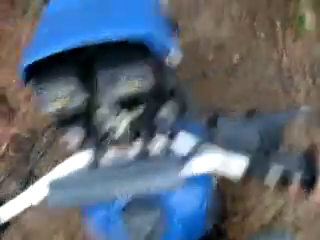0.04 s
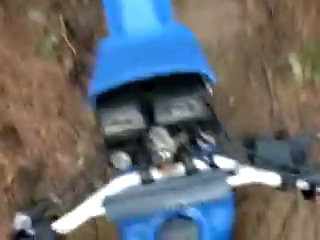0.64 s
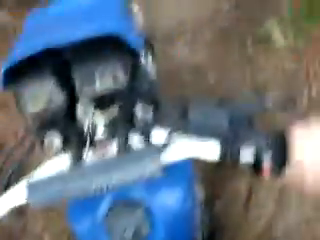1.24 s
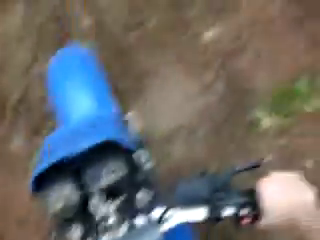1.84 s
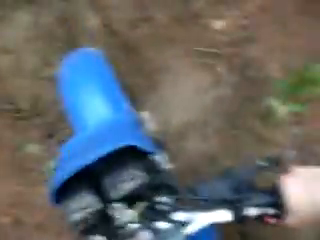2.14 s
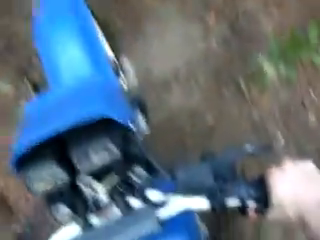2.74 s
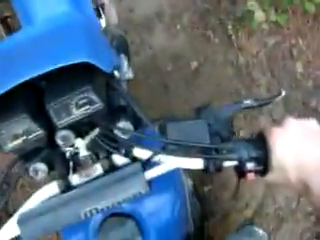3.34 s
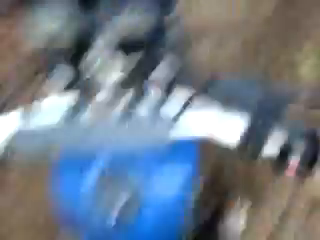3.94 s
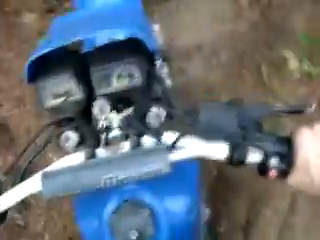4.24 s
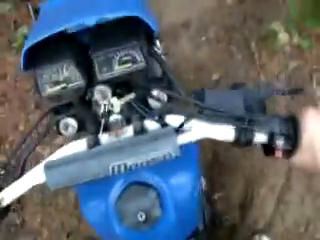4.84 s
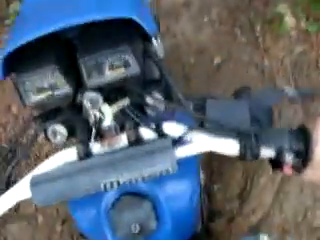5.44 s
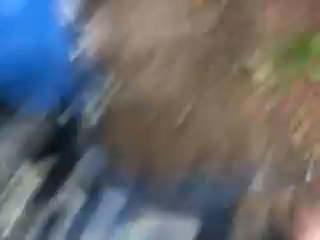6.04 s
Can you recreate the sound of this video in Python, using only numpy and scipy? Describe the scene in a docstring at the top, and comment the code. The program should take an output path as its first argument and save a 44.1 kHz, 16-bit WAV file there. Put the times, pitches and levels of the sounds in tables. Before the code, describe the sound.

Bursts of low thumps, plastic knocks and metallic clicks come from a stopped motorcycle being rocked, over faint hiss.

```python
"""A dirt bike, engine off, is rocked and shoved by the handlebar, outdoors on bare soil.
Close to the one microphone, the front end thumps and booms, plastic panels knock, tyres and
panels chafe, and small metal parts tick and scrape. Hard jolts make the hand-held camera pop;
its own hiss and thin whine lie under everything."""
import sys
import numpy as np
from scipy import signal
from scipy.fft import rfft, irfft, next_fast_len
from scipy.io import wavfile
from scipy.ndimage import map_coordinates

SR = 44100
rng = np.random.default_rng(int(sys.argv[2]) if len(sys.argv) > 2 else 0)


def unload_audio(sound):
    """Save the sound as a 16-bit wav file, at the path given as the first command line argument."""
    columns = np.transpose(np.atleast_2d(sound))
    # keep every value between -1 and 1, then stretch to whole-number steps
    steps = np.round(np.clip(columns, -1, 1) * 32767)
    wavfile.write(sys.argv[1], SR, steps.astype(np.int16))


N = 272531


def amp(db):
    """Decibels to gain."""
    return 10 ** (np.asarray(db) / 20)


def unit(x):
    """Scaled to rms 1."""
    return x / np.sqrt(np.mean(x ** 2) + 1e-20)


def add(track, start_s, sound):
    """Mix a sound into the track."""
    start = max(round(start_s * SR), 0)
    track[start:start + len(sound)] += sound[:max(N - start, 0)]


def wobble(rate_hz):
    """A smooth random curve through rate_hz knots a second."""
    knots = rng.standard_normal(int(N * rate_hz / SR) + 4)
    return map_coordinates(knots, [np.arange(N) * rate_hz / SR])


def gain(spectrum, hz):
    """Gain at hz, read from (freq_hz, level_db) points on a log axis."""
    freq_hz, level_db = np.transpose(spectrum)
    return amp(np.interp(np.log(hz + 1), np.log(freq_hz), level_db))


def filtered(x, response):
    """x shaped by a gain that is a function of frequency."""
    size = next_fast_len(len(x) + 8192)
    return irfft(rfft(x, size) * response(np.fft.rfftfreq(size, 1 / SR)), size)[:len(x)]


def body_response(spectrum, size=4096):
    """Minimum-phase ring with the given spectrum: it starts only at the blow."""
    cepstrum = irfft(np.log(gain(spectrum, np.fft.rfftfreq(size, 1 / SR))))
    cepstrum[1:size // 2] *= 2
    cepstrum[size // 2 + 1:] = 0
    return irfft(np.exp(rfft(cepstrum)))


def envelope(t, t60_s, rise_s):
    """A quick rise and a decay of 60 dB in t60_s."""
    return amp(-60 * t / t60_s) * (1 - np.exp(-t / rise_s))


def softness(level_db, double_db):
    """A factor that doubles with every double_db by which a blow is softer than full scale."""
    return 2 ** (-level_db / double_db)


def rattle(body, level_db, t60_s, rise_s, first_contact):
    """One blow: a firm first contact, then a dying flurry of tiny ones, all ringing a body."""
    t = np.arange(SR // 4) / SR
    fade = envelope(t, t60_s, rise_s)
    force = fade * rng.standard_normal(len(t))
    force[0] += first_contact * np.linalg.norm(fade)
    ring = signal.fftconvolve(force, body)[:len(t)]
    return amp(level_db) * ring * np.linalg.norm(fade) / np.linalg.norm(ring)


def background(air_db=-44.5, whine_db=-52.5, whine_hz=7849.5, skips_per_s=23):
    """Still outdoor air and hiss, with the camera's thin whine, which flutters as its phase skips."""
    # spectrum of the air and hiss: freq_hz, level_db
    air_spectrum = [(15, -34), (25, -4.5), (108, -2), (166, -5.5), (262, -4), (298, -7.5), (338, -4),
                    (519, -4.5), (905, -10.5), (1620, -15), (6020, -22.5), (7950, -22.5), (10500, -25.5),
                    (13600, -55), (22000, -120)]
    air = unit(filtered(rng.standard_normal(N), lambda hz: gain(air_spectrum, hz)))
    t = np.arange(N) / SR
    skip_index = (t * skips_per_s).astype(int)
    phase_rad = np.cumsum(rng.normal(0, 1.9, skip_index[-1] + 1))
    whine = unit(np.sin(2 * np.pi * whine_hz * t + phase_rad[skip_index]))
    return amp(air_db) * air + amp(whine_db) * whine


def strain(swell_share=0.77):
    """Each shove builds to its peak in swell_share of the time it takes to ease off."""
    # shifts of the bike's weight: peak_s, level_db, ease_s (to fall by 20 dB)
    shoves = [(.12, -46.5, .3), (.32, -39, 0.07), (.70, -36.5, 0.13), (.80, -36, 0.1), (1.0, -40, .2),
              (1.501, -19, 0.1633), (1.61, -28.5, 0.18), (2.1, -41, 1.1), (2.29, -38, 0.5),
              (2.58, -37.5, .1), (2.72, -40, 0.53), (3.07, -45, 0.4), (4.36, -36, 0.1), (4.49, -20, 0.15),
              (4.65, -31, 0.3), (5.05, -37, 0.33), (5.32, -45, 1), (5.70, -37, 0.1), (5.87, -45, 0.8),
              (6.05, -42, .2)]
    t, level = np.arange(N) / SR, np.zeros(N)
    for peak_s, level_db, ease_s in shoves:
        from_peak = np.maximum((peak_s - t) / swell_share, t - peak_s) / ease_s
        level = np.maximum(level, amp(level_db - 20 * from_peak))
    return level


def chafing(slip_db=2.0, bass_hz=200, stir_db=-31):
    """Tyres and panels rub softly in uneven little slips; only hard rubbing stirs the bass."""
    # spectrum of the rubbing: freq_hz, level_db
    rub_spectrum = [(25, -8), (70, 3.5), (180, 2.5), (400, 0.5), (700, -3), (1100, -18.5), (2000, -25.5),
                    (4000, -33.5), (11000, -57)]
    level = strain()
    slips = rng.standard_normal(N) * amp(slip_db * wobble(rate_hz=160))
    rub = unit(filtered(slips, lambda hz: gain(rub_spectrum, hz)))
    bass = filtered(rub, lambda hz: 1 / (1 + (hz / bass_hz) ** 4))
    bass_cut = 1 / (1 + (level / amp(stir_db)) ** 2)
    return level * (rub - bass_cut * bass)


def metal_ticks(focus_db=9, middle_hz=2900):
    """Small steel parts ring in the resonances nearest their pitch; larger ones are lower and duller."""
    # ticks of levers, cables and keys: start_s, level_db, pitch_hz
    ticks = [(.039, -33, 1700), (.088, -38.5, 2300), (1.461, -21.5, 3730), (1.513, -16.5, 4500),
             (1.53, -29, 3500), (1.581, -32.5, 2400), (1.688, -33, 2387), (1.743, -28.5, 1700),
             (1.805, -38, 2000), (1.847, -35.5, 3200), (2.31, -27, 3350), (2.711, -32, 2300),
             (2.76, -33.5, 2500), (4.451, -21.5, 2710), (4.515, -29, 4500), (4.536, -27, 3100),
             (4.588, -32.5, 2000), (4.703, -27.5, 2050), (4.751, -31.5, 2400), (4.807, -30.5, 2300),
             (4.828, -35.5, 2300), (5.759, -28.5, 2240), (5.821, -38, 2250)]
    # steel resonances before tuning to each part: freq_hz, width_hz, level_db
    steel_modes = [(1910, 230, 3.5), (2840, 210, 5), (3143, 180, 1), (3900, 420, -10), (4850, 1200, -12.5),
                   (6540, 310, -6)]
    out, t = np.zeros(N), np.arange(SR // 20) / SR
    for start_s, level_db, pitch_hz in ticks:
        tuning = (pitch_hz / middle_hz) ** 0.12
        steel = np.zeros(len(t))
        for freq_hz, width_hz, mode_db in steel_modes:
            weight = amp(mode_db - focus_db * np.log2(freq_hz / pitch_hz) ** 2) * width_hz
            steel += weight * np.exp(-np.pi * width_hz * t) * np.sin(2 * np.pi * freq_hz * tuning * t)
        low_hz, top_hz = 0.55 * pitch_hz, 5500 + pitch_hz / 2
        steel = filtered(steel, lambda hz: 1 / (1 + (hz / top_hz) ** 4))
        steel = signal.lfilter(*signal.butter(2, low_hz, 'high', fs=SR), steel)
        add(out, start_s, rattle(steel, level_db, t60_s=0.025, rise_s=0.001, first_contact=0.61))
    return out


def panel_knocks(longest_t60_s=0.16):
    """Loose plastic panels give dull, hollow knocks; only heavy blows stir the bass."""
    # blows on the panels: start_s, level_db, tilt_db_per_octave
    knocks = [(.1, -33, 2.5), (.224, -31, -4), (.286, -31.5, 1), (.730, -29, -5), (.760, -24, -8),
              (0.8808, -2.5, 0.3), (.888, -14.5, -6.5), (1.432, -24.5, 1), (1.454, -16, -3),
              (1.482, -19, -1), (1.514, -10, -1), (1.527, -15.5, -1), (1.581, -19, 1), (1.937, -35, -3.5),
              (2.059, -25, 0), (2.091, -32, -0.5), (2.280, -30, -2.5), (2.459, -30, -2.5), (2.567, -25, -2),
              (2.802, -33, -1.5), (2.961, -34.5, -0.5), (3.055, -34, -2.5), (4.416, -27.5, .5),
              (4.425, -18, -3.5), (4.451, -14, -8), (4.479, -18, -2.5), (4.512, -23, -4.5),
              (4.594, -21, -3), (4.608, -14, -1), (4.701, -27, 0.5), (5.002, -28.5, 1), (5.163, -28, -1.5),
              (5.82, -31, 0.5), (6.036, -32, 0)]
    # spectrum of a struck panel: freq_hz, level_db
    panel_spectrum = [(30, -21), (110, -7), (220, -3.5), (290, -1), (390, 3), (460, -1.5), (560, -1.5),
                      (740, -4.5), (1000, -12.5), (1500, -20.5), (2400, -29), (5000, -49), (11000, -60)]
    out = np.zeros(N)
    for start_s, level_db, tilt in knocks:
        # a hard knock seats the panel at once; a light one starts softly and leaves it rattling
        free_t60_s = 0.017 * softness(level_db, double_db=7)
        t60_s = 1 / (1 / free_t60_s + 1 / longest_t60_s)
        rise_s = 0.00017 * softness(level_db, double_db=9)
        # a light knock moves only part of the panel, so its bass ends higher
        lowest_hz = 90.3 * softness(level_db, double_db=19.5)
        panel = body_response([(hz, db + tilt * np.log2(hz) - 10 * np.log10(1 + (lowest_hz / hz) ** 4))
                               for hz, db in panel_spectrum])
        add(out, start_s, rattle(panel, level_db, t60_s, rise_s, first_contact=0.18))
    return out


def front_end_thumps(fork_hz=123.9, waver_db=7.0, sway_below_thud_db=31):
    """A jolt gives a low thud; the sprung front end booms on while the whole bike shudders to rest."""
    # jolts of the front end: start_s, thud_db, thud_hz, boom_db, boom_t60_s
    jolts = [(.730, -11, 178, -16.5, 0.243), (.801, -27, 161, -36, .1), (.873, -4, 63.5, -15, 0.49),
             (.887, -5.5, 74, -20, 0.12), (.903, -15, 240, -28, .1), (1.452, -13, 72.2, -36, .2),
             (1.5155, -8.5, 280, -27, .25), (1.589, -21, 185, -43, .2), (1.945, -35.5, 178, -55, .1),
             (2.402, -36, 147.3, -41.5, 1), (2.6, -27, 101.8, -26.5, 0.44), (4.45, -8.5, 160, -35, .2),
             (4.476, -2, 202.4, -30, 0.28), (4.599, -7.5, 76, -17.5, .2), (4.603, -5.5, 220, -39, .1),
             (4.622, -3, 161, -17.5, 0.38), (4.704, -8, 78, -24, .1), (4.713, -15, 158, -11, 0.15),
             (5.027, -28, 200.3, -35, 0.266), (5.101, -35, 106.4, -43, 0.76), (5.30, -30, 224, -57.5, .1)]
    # spectrum of the shuddering bike: freq_hz, level_db
    sway_spectrum = [(20, -33), (45, 0), (62, -3), (90, -7.5), (180, -7), (300, -31), (1000, -80)]
    out, t = np.zeros(N), np.arange(SR) / SR
    for start_s, thud_db, thud_hz, boom_db, boom_t60_s in jolts:
        thud_cycles = 5.56 * softness(thud_db, double_db=13)
        thud = np.sin(2 * np.pi * thud_hz * t) * envelope(t, thud_cycles / thud_hz, rise_s=0.002)
        # play in the joints makes the boom waver more as it dies
        play = 1 - np.exp(-t / 0.11)
        swell = play * wobble(rate_hz=29.0)[:SR]
        drift_rad = play * wobble(rate_hz=25.9)[:SR]
        boom = np.sin(2 * np.pi * fork_hz * t + drift_rad) * amp(waver_db * swell)
        boom *= envelope(t, boom_t60_s, rise_s=0.00103)
        sway = unit(filtered(rng.standard_normal(SR), lambda hz: gain(sway_spectrum, hz)))
        sway *= amp(-sway_below_thud_db) * envelope(t, t60_s=1.15, rise_s=0.002)
        add(out, start_s, amp(thud_db) * (thud + sway) + amp(boom_db) * boom)
    return out


def metal_scrapes():
    """Sliding metal gives a faint, narrow rasp that swells and stops."""
    # slides of metal on metal: start_s, length_s, level_db, centre_hz, half_width_octaves
    slides = [(0.811, 0.098, -47, 1360, 0.08), (1.634, 0.072, -46, 3510, 0.62),
              (4.469, 0.05, -44, 2540, 0.06), (4.484, .045, -45, 4800, 0.13)]
    out = np.zeros(N)
    for start_s, length_s, level_db, centre_hz, half_width in slides:
        stroke = np.sin(np.linspace(0, np.pi, round(length_s * SR)))
        band = lambda hz: 1 / (1 + (np.log2((hz + 1) / centre_hz) / half_width) ** 2)
        rasp = unit(filtered(rng.standard_normal(len(stroke)), band))
        add(out, start_s, amp(level_db) * stroke * rasp)
    return out


def camera_pops(recovery_s=0.0015):
    """The jolted camera's signal jumps at once and creeps back."""
    # electrical pops: start_s, step_full_scale (signed)
    pops = [(0.906, -0.69), (1.4329, -0.053), (1.477, 0.2), (1.5204, 0.32), (1.6092, 0.19), (4.4181, -0.09),
            (4.462, -0.26), (4.5055, -0.24), (4.55, 0.12), (4.6377, 0.32), (4.7256, 0.18), (4.7687, 0.086)]
    out, t = np.zeros(N), np.arange(SR // 20) / SR
    for start_s, step in pops:
        add(out, start_s, step * np.exp(-t / recovery_s))
    return out


def scene():
    """The bike stands close to the one microphone, with no walls to answer."""
    bike = front_end_thumps() + panel_knocks() + metal_ticks() + metal_scrapes() + chafing()
    return (bike + camera_pops() + background())[None]


def record(dry):
    """The camera overloads at full scale and keeps nothing above its band limit."""
    top_hz = 10750
    low_pass = lambda hz: 1 / np.sqrt(1 + (hz / top_hz) ** 120)
    return filtered(np.clip(dry[0], -1, 1), low_pass)[None]


dry = scene()
out = record(dry)
unload_audio(out)
```